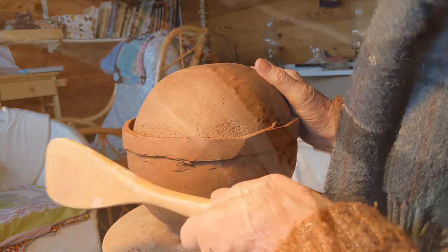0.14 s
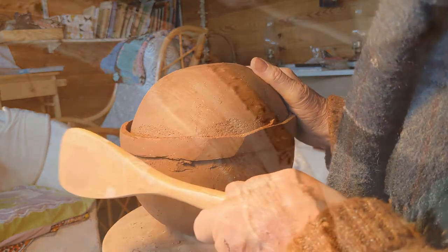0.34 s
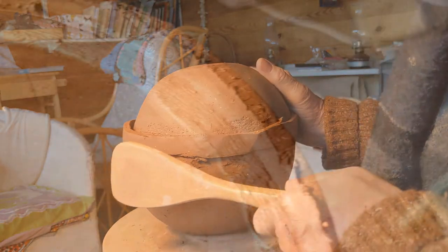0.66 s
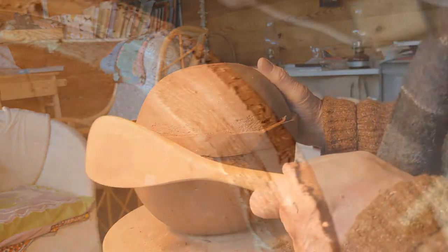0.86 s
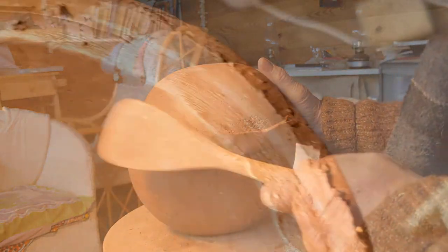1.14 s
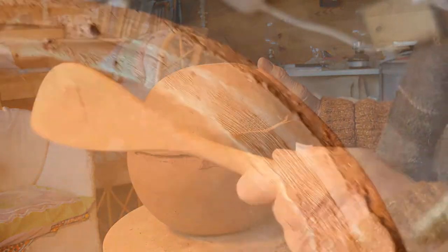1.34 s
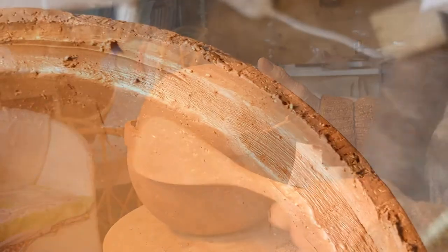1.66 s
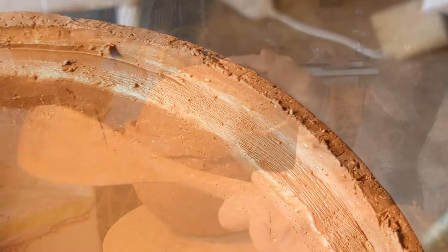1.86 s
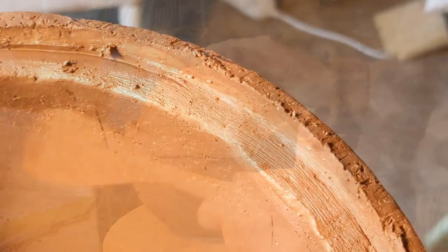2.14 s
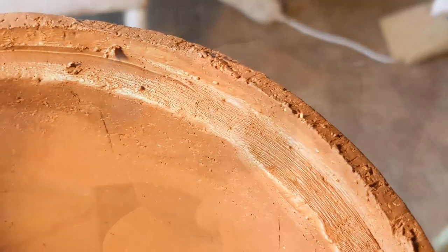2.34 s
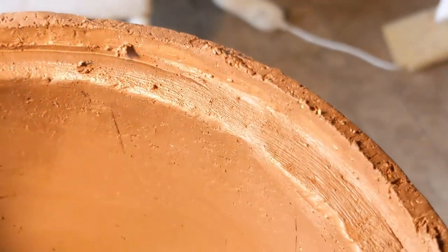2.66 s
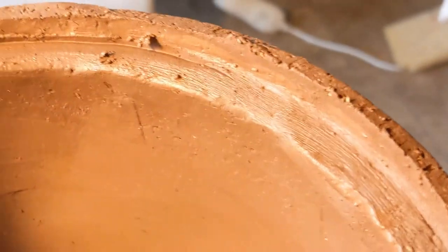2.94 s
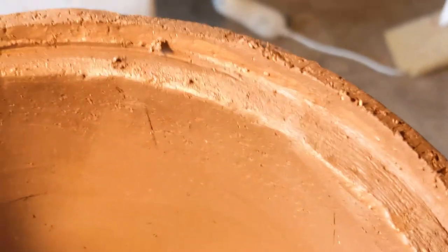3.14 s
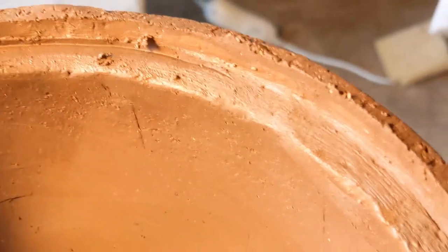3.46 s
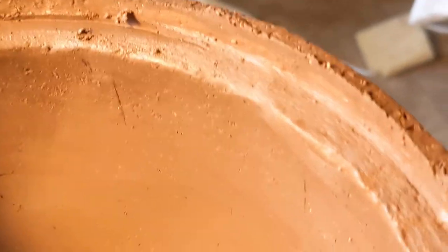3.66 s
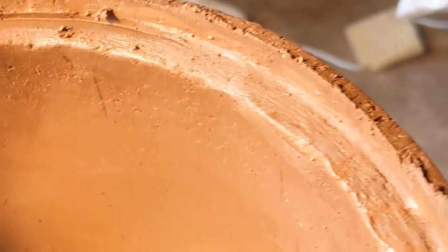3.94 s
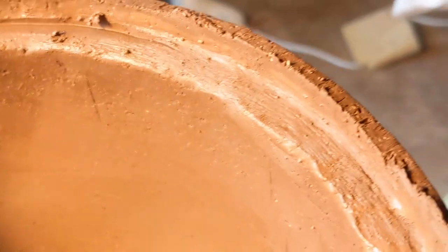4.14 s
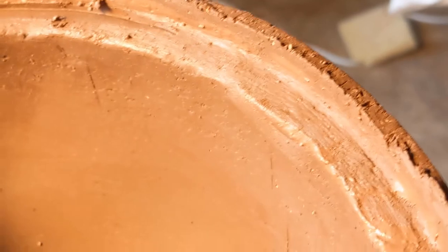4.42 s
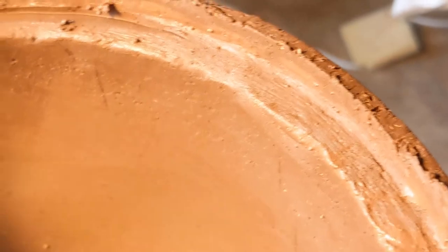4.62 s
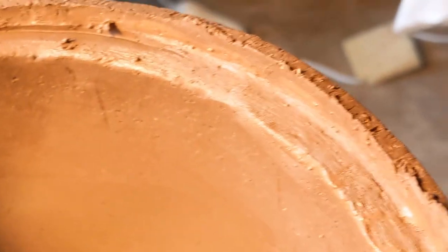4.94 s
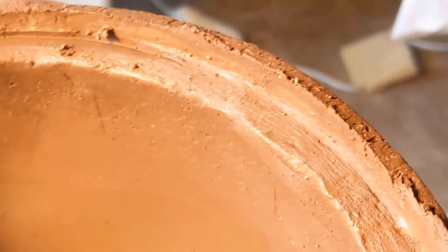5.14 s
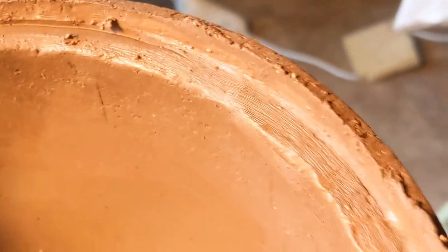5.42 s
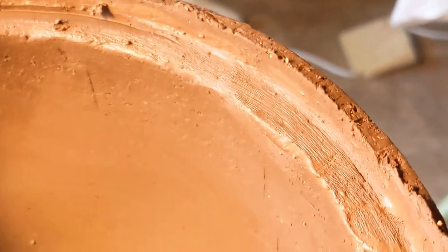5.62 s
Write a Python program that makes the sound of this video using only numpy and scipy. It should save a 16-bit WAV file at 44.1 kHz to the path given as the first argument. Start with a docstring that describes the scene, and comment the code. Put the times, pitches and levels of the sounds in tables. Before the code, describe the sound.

Sharp, wet pats of wood on a hollow clay pot, about four a second, then faint finger rubbing in a small room.

```python
"""A wooden paddle pats the wall of a soft clay pot sixteen times, about four slaps a second. Each slap is a wet
snap, a crack of the blade, a knock of the wall and a dull thud of the hollow pot. The stereo microphone stands
close, the loudest swings are held down, and the small studio rings on behind it. Around the slaps come short
rubs on the clay, one light tap and a few sticky ticks, over a low room hum. Near the end fingers smooth the rim
and a low drone sets in."""
import sys
import numpy as np
from scipy import signal
from scipy.io import wavfile
from scipy.ndimage import map_coordinates

SR = 44100
rng = np.random.default_rng(int(sys.argv[2]) if len(sys.argv) > 2 else 0)


def master_out(mix):
    """Clip the mix to full scale and print it as 16-bit PCM to the path in sys.argv[1]."""
    frames = np.transpose(np.atleast_2d(mix))
    ceiling = np.clip(frames, -1, 1)
    pcm = np.round(ceiling * 32767).astype(np.int16)
    wavfile.write(sys.argv[1], SR, pcm)


N = 255416
TIME = np.arange(N) / SR
BLOW = np.arange(SR // 3) / SR
TAIL = np.arange(SR // 2) / SR
CUTOFF_HZ = 15800


def paddle():
    """Close up, every slap drives the hollow pot, its wall, the blade and the wet surface at once."""
    # Modes of the hollow pot and of its wall. Each row: pitch in Hz, relative level in dB,
    # t60 in seconds, left over right in dB.
    pot_modes = [(255, -12, 0.15, 2.5), (287.5, 3, 0.044, 1), (460.2, 6.5, 0.02, -2),
                 (540, -28, 0.024, -5.5)]
    wall_modes = [(808, 1, 0.01, 16), (1013, 0, 0.016, 16), (1265, -5, 0.015, 15), (1430, 2.5, 0.0079, 6),
                  (1710, -7.5, 0.038, 6.6)]
    out = np.zeros((2, N))
    for s, thud_db, knock_db, crack_db, snap_db, centre_hz, edge_hz, _ in blows():
        pot = struck(pot_modes, vary_db=.7, detune=.01)
        wall = struck(wall_modes, vary_db=4, detune=.023)
        thud = cut(cut(pot, 100, "high"), 620, "low")
        knock = cut(cut(wall, 1200, "low"), 360, "high")
        crack = blade_crack(centre_hz, focus_db=10.5)
        snap = wet_snap(edge_hz, hiss_db=-4, hiss_t60=.009, pan_db=-6)
        add(out, s, blow_level(thud, thud_db) + blow_level(knock, knock_db)
            + blow_level(crack, crack_db + .5) + blow_level(snap, snap_db + 4.5))
    return out


def blows():
    """Force, wetness and squareness of each slap set its knock, room boom and brightness."""
    # Each row: start in seconds, then base levels in dB of the thud, the crack and the snap.
    slaps = [(1.1915, -29, -35, -39.5), (1.456, -22.5, -20.5, -34), (1.7076, -21, -20, -27),
             (1.9608, -23.5, -18.5, -28), (2.2111, -26.5, -18, -26), (2.4739, -26.5, -17, -26.5),
             (2.7228, -26.5, -18, -28), (2.9723, -32.5, -23.5, -23), (3.2361, -26, -19, -30),
             (3.4862, -26, -19.5, -28.5), (3.7388, -27.5, -21, -25.5), (3.9937, -25.5, -19.5, -29.5),
             (4.2509, -27.5, -22, -24), (4.5047, -23.5, -19.5, -29), (4.7604, -24.5, -19, -32.5),
             (5.0163, -34, -20, -30)]
    s, thud_db, crack_db, snap_db = np.transpose(slaps)
    heavy, hard, wet = (db - db.mean() for db in (thud_db, crack_db, snap_db))
    # A wetter spot cushions the knock and raises the crack.
    knock_db = -30.5 + .54 * (heavy + hard) / 2 - .32 * wet
    centre_hz = 3230 * 2 ** (.05 * wet)
    # A squarer contact gives less boom and a brighter snap.
    square = hard - (heavy + wet) / 2
    boom_db = -45.5 + heavy - .36 * square
    edge_hz = 8930 * 2 ** (.2 * square)
    return np.transpose([s, thud_db, knock_db, crack_db, snap_db, centre_hz, edge_hz, boom_db])


def blade_crack(centre_hz, focus_db):
    """The spot of contact favours the wooden blade's modes around one pitch."""
    # Each row: pitch in Hz, relative level in dB, t60 in seconds, left over right in dB.
    blade_modes = [(2170, -7.5, 0.023, -5), (2486, -1, .016, 2.5), (2548, -6, 0.013, 13),
                   (2915, -10.5, .012, 5), (2994, -5, 0.0046, 2), (3280, -13.5, 0.02, -0.5),
                   (3578, -4, 0.013, 11), (3860, -10.5, 0.018, 5.5), (4017, -13.5, 0.039, 5),
                   (4320, -3, 0.014, 7.5)]
    favoured = [(hz, db - focus_db * np.log2(hz / centre_hz) ** 2, t60, pan_db)
                for hz, db, t60, pan_db in blade_modes]
    return cut(struck(favoured, vary_db=6, detune=.0038, stagger=.61), [1950, 6500], "band")


def wet_snap(edge_hz, hiss_db, hiss_t60, pan_db):
    """Air and slip burst from under the blade: a very short hiss and a click of its upper modes."""
    # Each row: pitch in Hz, relative level in dB, t60 in seconds, left over right in dB.
    upper_modes = [(5370, 2, 0.012, -7), (5990, -3, 0.0064, -14.5), (6880, -0.5, 0.0036, -15.5),
                   (7900, -1.5, 0.0062, -7.5), (9100, -7.5, 0.0036, -4), (12600, 1, 0.0027, -7.5),
                   (14200, -5, 0.0018, -5.5)]
    hiss = from_db(hiss_db) * rng.standard_normal(len(BLOW)) * dying(BLOW, hiss_t60)
    snap = panned(hiss, pan_db) + struck(upper_modes, vary_db=1.5, detune=.01)
    return cut(cut(snap, 4700, "high", order=3), edge_hz, "low")


def struck(modes, vary_db, detune, stagger=0):
    """Modes ring from one blow; where the blade lands changes their strength and pitch a little."""
    out = 0
    for k, (hz, db, t60, pan_db) in enumerate(modes):
        strength, shift = rng.standard_normal(2)
        # The blow takes a moment to spread, so successive modes lag by `stagger` radians.
        ring = np.cos(2 * np.pi * hz * (1 + detune * shift) * BLOW - k * stagger) * dying(BLOW, t60)
        out = out + panned(from_db(db + vary_db * strength) * ring, pan_db)
    return out


def from_the_right(x, lag_s):
    """The pot stands to the right, so its sound reaches the microphone's left side a little later."""
    left = map_coordinates(x[0], [np.arange(N) - lag_s * SR], order=3)
    return np.array([left, x[1]])


def reflections(build_s, flutter_db):
    """The studio's dense reflections take on each slap's colour, build up fast and die band by band."""
    # Each row: frequency in Hz, half-octave level in dB relative to the blow, t60 in seconds.
    tail_bands = [(60.5, -41, 0.45), (142, -16.5, 0.12), (280, -15.5, 0.35), (500, -17.5, 0.24),
                  (730, -15.5, 0.19), (1260, -16.5, 0.23), (1650, -17.5, 0.18), (2500, -16.5, .21),
                  (3500, -16, 0.2), (4770, -12, 0.19), (7350, -7, .19), (8796, -10, 0.21),
                  (13700, -6.5, 0.047)]
    # Each row: frequency in Hz, likeness of left and right from 0 to 1.
    likeness = [(150, .95), (400, .7), (1000, .3), (2500, .1)]
    # Centres in Hz of the thud, knock, crack and snap.
    part_hz = [450, 1300, 2900, 7000]
    slaps = blows()
    out = np.zeros((2, N))
    for hz, (mid, side) in bands(N):
        noise = rms_one(stereo(mid, side, at_hz(likeness, hz)))
        decay = dying(TAIL, at_hz(tail_bands, hz, column=2)) * swelling(TAIL, build_s)
        level = np.zeros((1, N))
        for (s, *part_db, _, edge_hz, _), chance in zip(slaps, rng.standard_normal(len(slaps))):
            blow_db = np.interp(np.log(hz), np.log(part_hz), part_db) + flutter_db * chance
            rolloff = 1 / np.sqrt(1 + (hz / edge_hz) ** 2)
            add(level, s, from_db(blow_db + at_hz(tail_bands, hz)) * decay * rolloff)
        out += level * noise
    return out


def ringing(tail):
    """Pot, blade and room stress the same few pitches in the studio's ring after each slap."""
    # Peaks and hollows. Each row: centre in Hz, width in Hz, gain in dB.
    ring_peaks = [(97, 15, -11.5), (660, 130, -10), (1070, 83, 1.5), (1076, 40, 5.5), (1930, 200, -1.5),
                  (2160, 63, 6.5), (2495, 86, 8), (2830, 77, 4), (3140, 37, 7), (3370, 35, 7),
                  (4100, 150, 4.5), (3900, 55, 7), (5370, 46, 3)]
    return peaked(tail, ring_peaks)


def standing_waves(build_s):
    """Each thud sets the low modes of the studio swelling and then humming briefly."""
    # Each row: pitch in Hz, relative level in dB, t60 in seconds, left over right in dB.
    room_modes = [(71.6, -10, 0.46, -0.5), (139.1, -9, 0.43, 4), (182, -7.5, 0.29, -2.5),
                  (238.3, 6, .28, -0.5), (244, -8, 0.069, -1.5), (316, -9.5, 0.24, 1),
                  (339, -14.5, 0.23, -0.5)]
    out = np.zeros((2, N))
    for s, *_, boom_db in blows():
        boom = struck(room_modes, vary_db=1.5, detune=0) * swelling(BLOW, build_s)
        add(out, s, blow_level(boom, boom_db, window_s=.1))
    return out


def clay_handling(grain_db):
    """Short grainy rubs on damp clay, one light tap and a few tiny ticks."""
    # Rubs and, third, a light paddle tap. Each row: peak time in seconds, level in dB,
    # rise and fall in seconds, centre in Hz, width in octaves.
    touches = [(.368, -57.5, 0.021, 0.031, 179, 1.76), (.574, -56.5, 0.0077, 0.03, 640, 2.34),
               (.591, -49.5, 0.0012, .004, 1460, 0.25), (5.45, -64.5, .02, 0.026, 2410, 2.2),
               (5.575, -59.5, .025, 0.018, 1800, 2.1)]
    # Sticky ticks of the clay. Each row: start in seconds, peak level in dB, centre in Hz.
    ticks = [(.546, -49, 4130), (0.612, -51, 6800), (0.621, -50, 4130), (.674, -52.5, 6750),
             (3.894, -51.5, 6700)]
    out = np.zeros((2, N))
    for s, db, rise_s, fall_s, hz, octaves in touches:
        half = 2 ** (octaves / 2)
        out += from_db(db) * contact(s, rise_s, fall_s, [hz / half, hz * half], grain_db)
    for s, db, hz in ticks:
        burst = rng.standard_normal(len(BLOW)) * dying(BLOW, t60=.0068)
        tick = cut(burst, hz * np.sqrt([.5, 2]), "band", order=1)
        add(out, s, from_db(db) * tick / np.abs(tick).max())
    return out


def graze():
    """Before the first slap the blade scrapes lightly over the pot and sings at a few pitches."""
    # Each row: centre in Hz, width in Hz, gain in dB.
    resonances = [(2150, 130, 15.5), (3460, 63, 0), (4900, 80, 9), (5740, 73, 8)]
    scrape = contact(peak_s=.302, rise_s=.0066, fall_s=.027, edges_hz=[1100, 6500], grain_db=6)
    return peaked(from_db(-56.5) * scrape, resonances)


def contact(peak_s, rise_s, fall_s, edges_hz, grain_db):
    """One brief contact with damp clay: grainy noise swells quickly, then dies away."""
    grains = rng.standard_normal(N) * from_db(grain_db * rng.standard_normal(N))
    t = TIME - peak_s
    envelope = np.exp(-np.where(t < 0, (t / rise_s) ** 2, t / fall_s))
    return envelope * rms_one(cut(grains, edges_hz, "band"))


def rim_smoothing(start_s, attack_s, press_s, press_width_s, drone_hz):
    """Fingers smooth the rim and bear down once; a low drone sets in with them."""
    # Each row: frequency in Hz, relative noise density in dB.
    spectrum = [(25, -28), (62, -10.5), (105, -22), (240, -24), (330, -16), (450, -27), (1200, -32),
                (1800, -27.5), (2700, -35.5), (4700, -41.5), (7000, -40.5), (16000, -51.5)]
    touch = np.clip((TIME - start_s) / attack_s, 0, 1)
    press = np.exp(-((TIME - press_s) / press_width_s) ** 2)
    rubbing = from_db(-62.5 + 5.5 * press) * steady_noise(spectrum)
    drone = from_db(-60) * np.sqrt(2) * np.sin(2 * np.pi * drone_hz * TIME)
    return touch * (rubbing + drone)


def room_tone():
    """The studio itself, behind everything: a low hum and a faint hiss."""
    # Each row: frequency in Hz, relative noise density in dB.
    spectrum = [(25, -29), (40, -16), (58, -6), (75, -17.5), (100, -29), (150, -22.5), (240, -24),
                (400, -29.5), (750, -35), (1500, -36), (2400, -38.5), (5000, -41.5), (8000, -43),
                (15000, -50.5)]
    # Peaks and hollows. Each row: centre in Hz, width in Hz, gain in dB.
    tone_peaks = [(30, 12, -11), (58, 11, 6.5), (6900, 400, 5)]
    return peaked(from_db(-66.5) * steady_noise(spectrum), tone_peaks)


def steady_noise(spectrum):
    """Stereo noise at rms 1, alike on both sides of the microphone only in the bass."""
    # Each row: frequency in Hz, likeness of left and right from 0 to 1.
    likeness = [(60, .92), (180, 0.39), (550, 0.36), (1650, 0)]
    return rms_one(sum(from_db(at_hz(spectrum, hz)) * stereo(mid, side, at_hz(likeness, hz))
                       for hz, (mid, side) in bands(N)))


def bands(size):
    """Yields the centre in Hz and two unrelated noises for each band, about half an octave wide."""
    edges = np.append(22 * 2 ** (np.arange(20) / 2), CUTOFF_HZ + 2000)
    white = rng.standard_normal((2, 2, size + SR // 4))
    for k, (low, high) in enumerate(zip(edges, edges[1:])):
        yield np.sqrt(low * high), cut(white[k % 2], [low, high], "band")[:, -size:]


def stereo(mid, side, alike):
    """Blends two noises into left and right with correlation `alike`."""
    return np.sqrt(1 + alike) * mid + np.sqrt(1 - alike) * side * [[1], [-1]]


def peaked(x, peaks):
    """Lifts or hollows narrow bands, one after another."""
    for hz, width, db in peaks:
        x = x + (from_db(db) - 1) * signal.lfilter(*signal.iirpeak(hz, hz / width, fs=SR), x)
    return x


def blow_level(x, db, window_s=.01):
    """Scales a blow to the given rms level over its opening window."""
    return from_db(db) * x / np.sqrt(np.mean(x[:, :round(window_s * SR)] ** 2))


def at_hz(points, hz, column=1):
    """Reads a column of a table on a log-frequency axis."""
    table = np.array(points)
    return np.interp(np.log(hz), np.log(table[:, 0]), table[:, column])


def add(out, s, x):
    """Mixes a sound in at s seconds."""
    i = round(s * SR)
    out[:, i:i + x.shape[-1]] += x[..., :N - i]


def cut(x, hz, kind, order=2):
    return signal.sosfilt(signal.butter(order, np.clip(hz, 10, .45 * SR), kind, fs=SR, output="sos"), x)


def swelling(t, build_s):
    return 1 - np.exp(-(t / build_s) ** 2)


def dying(t, t60):
    return np.exp(-np.log(1000) * t / t60)


def panned(x, pan_db):
    return x * from_db([[pan_db / 2], [-pan_db / 2]])


def from_db(db):
    return 10 ** (np.asarray(db) / 20)


def rms_one(x):
    return x / np.sqrt(np.mean(x ** 2) + 1e-20)


def scene():
    """The close slaps, their ring in the studio, the handling of the clay and the room tone."""
    studio = ringing(reflections(build_s=.00044, flutter_db=.5)) + standing_waves(build_s=.01)
    slaps = from_the_right(paddle(), lag_s=.000092)
    handling = clay_handling(grain_db=4.5) + graze()
    rim = rim_smoothing(start_s=5.265, attack_s=.024, press_s=5.6, press_width_s=.12, drone_hz=60.3)
    return slaps + studio + handling + rim + room_tone()


def record(dry):
    """The loudest swings of each slap are held down and rounded; the deepest bass and the top are cut."""
    ceiling = .72
    rounded = dry / (1 + (dry / ceiling) ** 4) ** (1 / 4)
    thinned = cut(rounded, 29, "high", order=4)
    return signal.sosfilt(signal.ellip(8, .1, 90, CUTOFF_HZ, fs=SR, output="sos"), thinned)


dry = scene()
out = record(dry)
master_out(out)
```